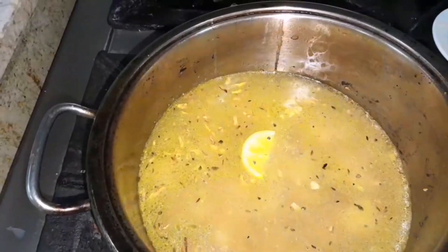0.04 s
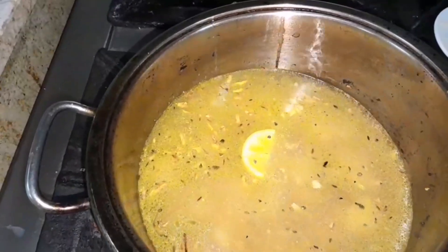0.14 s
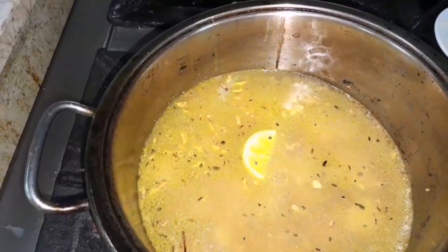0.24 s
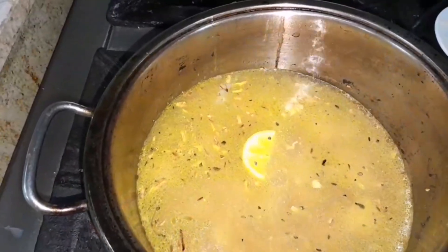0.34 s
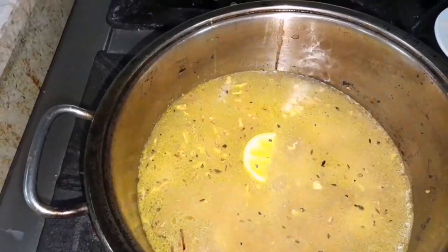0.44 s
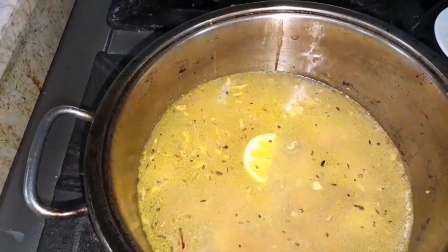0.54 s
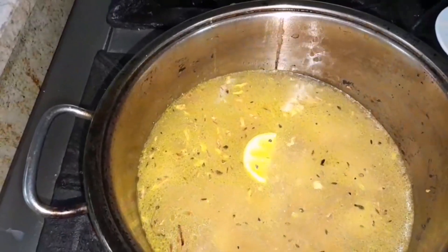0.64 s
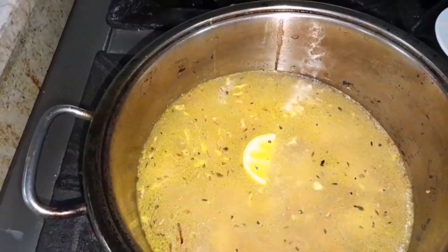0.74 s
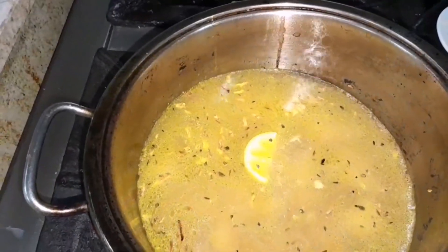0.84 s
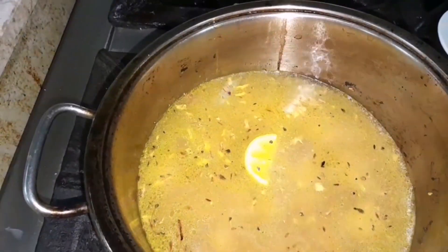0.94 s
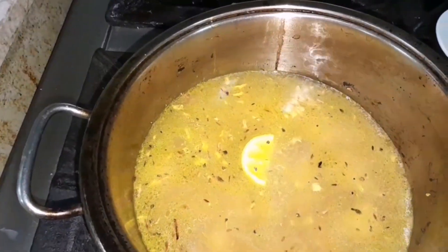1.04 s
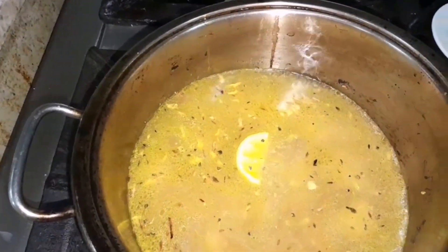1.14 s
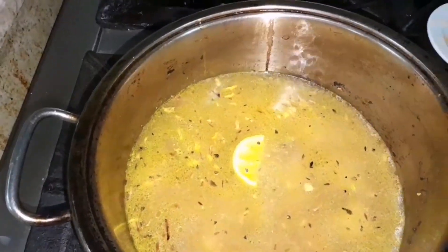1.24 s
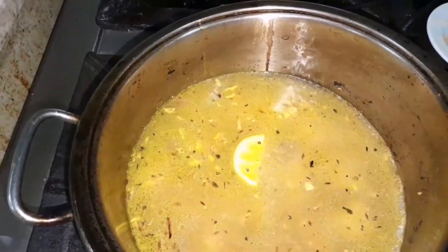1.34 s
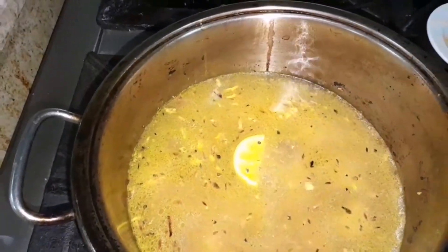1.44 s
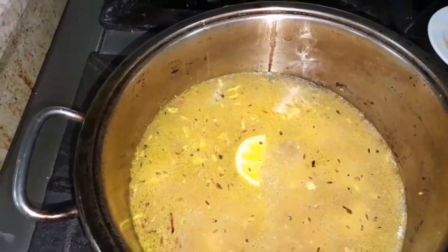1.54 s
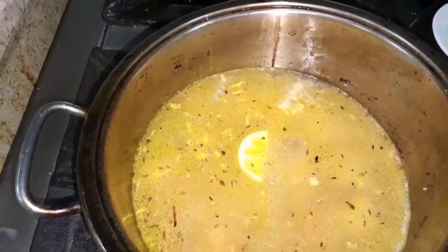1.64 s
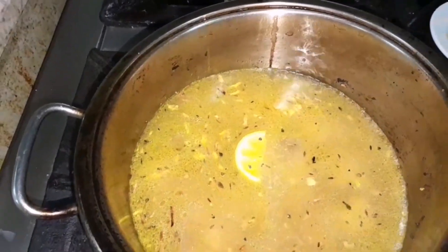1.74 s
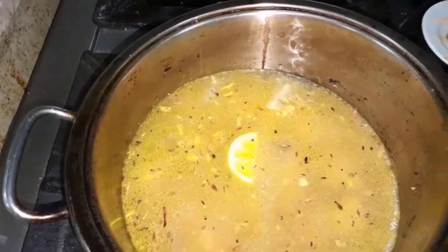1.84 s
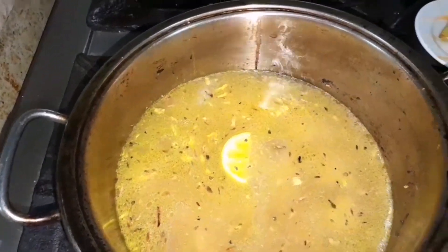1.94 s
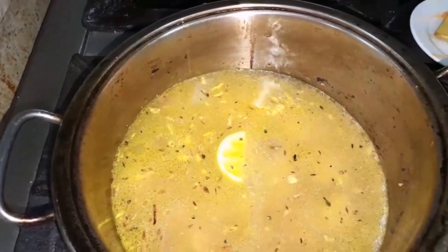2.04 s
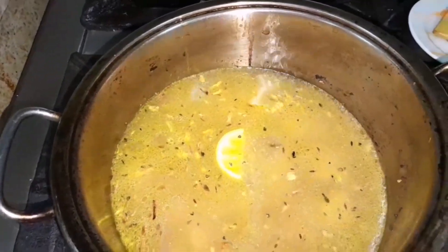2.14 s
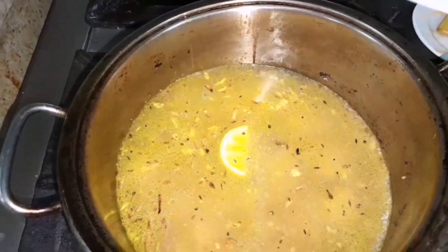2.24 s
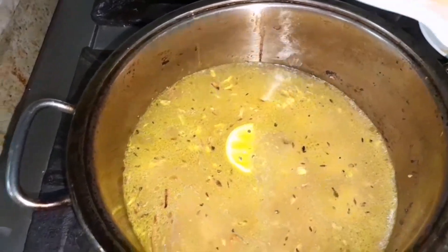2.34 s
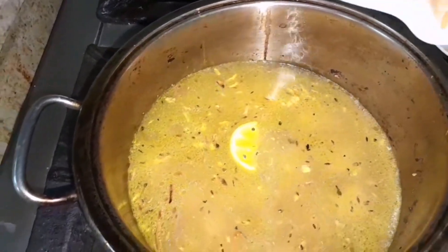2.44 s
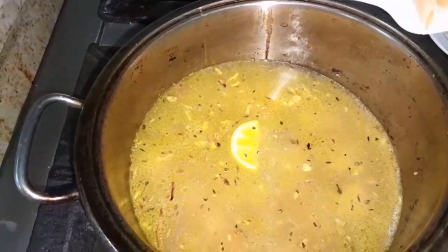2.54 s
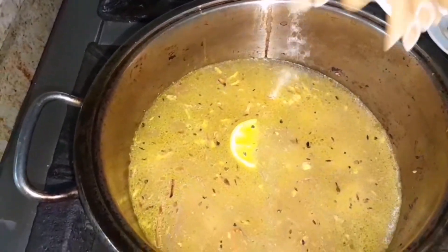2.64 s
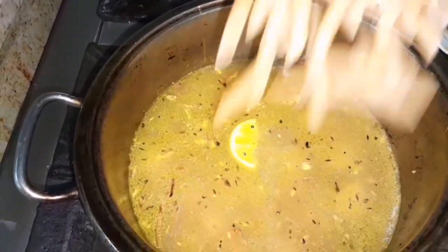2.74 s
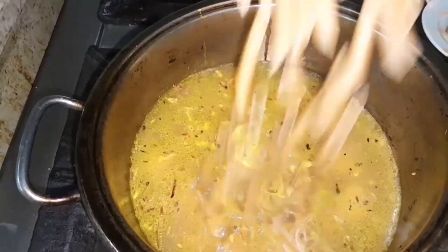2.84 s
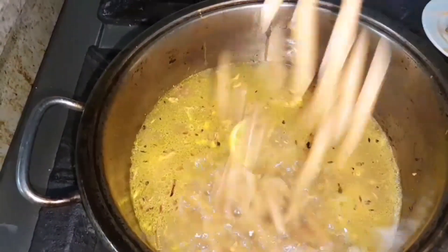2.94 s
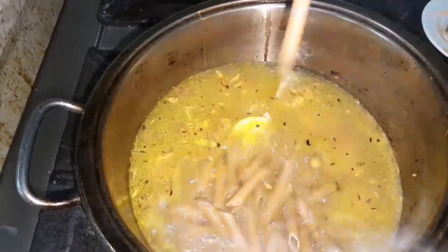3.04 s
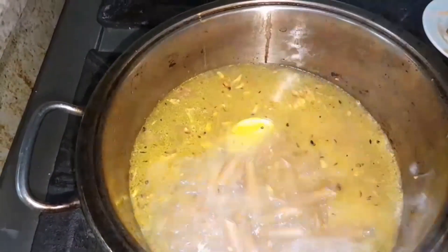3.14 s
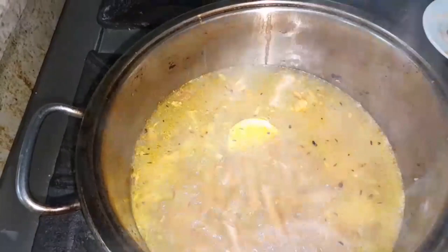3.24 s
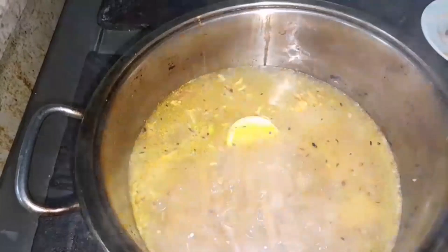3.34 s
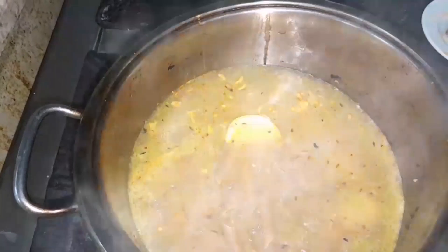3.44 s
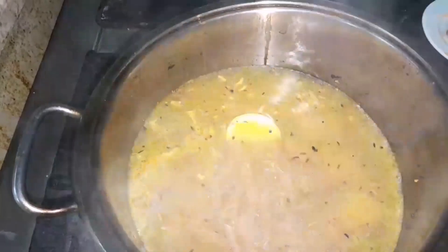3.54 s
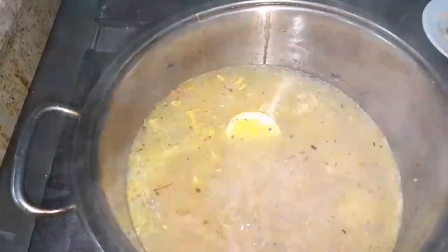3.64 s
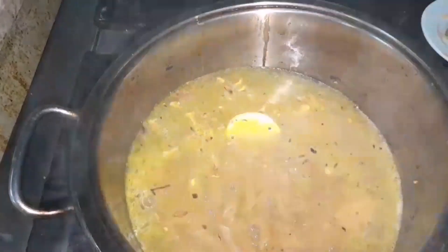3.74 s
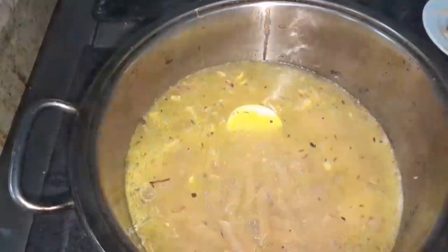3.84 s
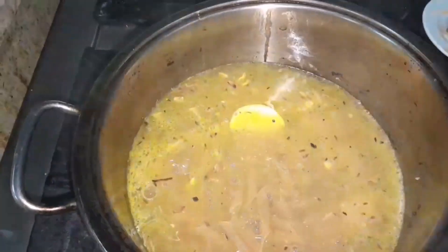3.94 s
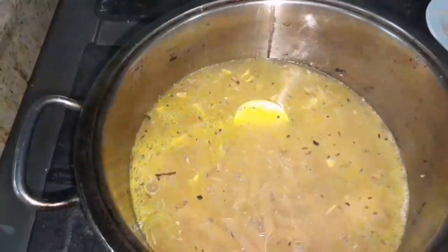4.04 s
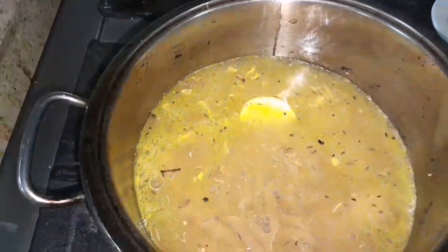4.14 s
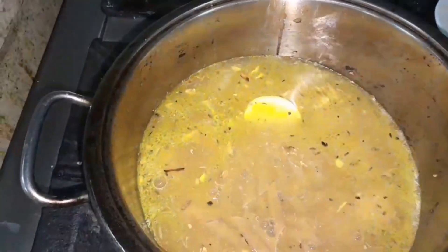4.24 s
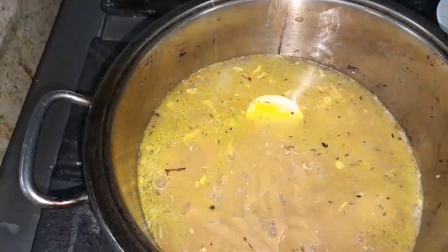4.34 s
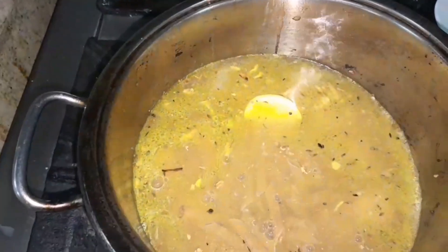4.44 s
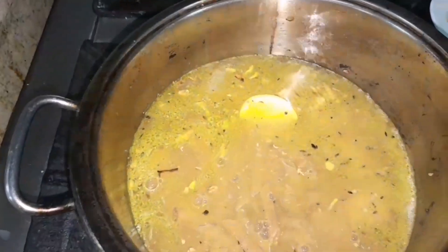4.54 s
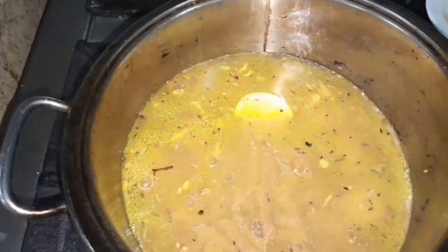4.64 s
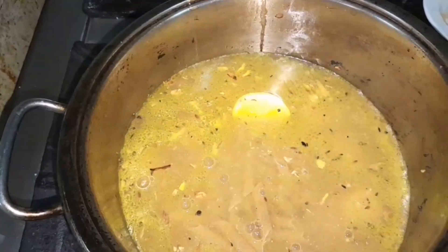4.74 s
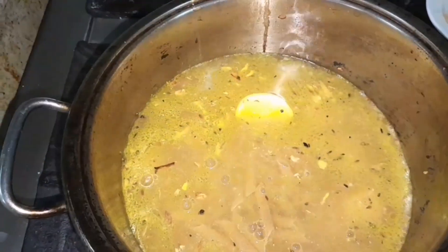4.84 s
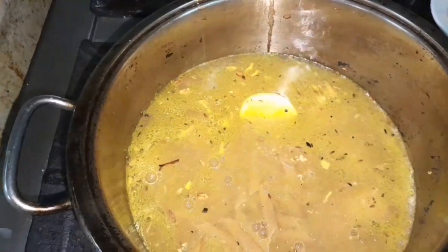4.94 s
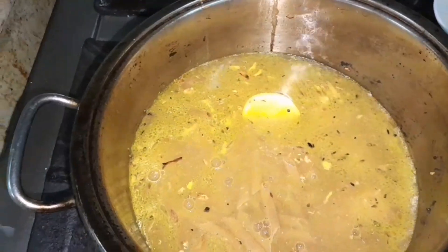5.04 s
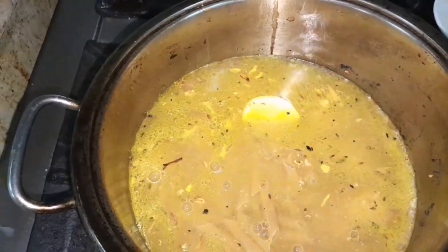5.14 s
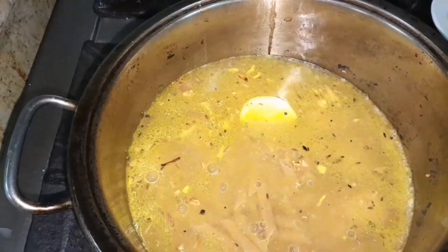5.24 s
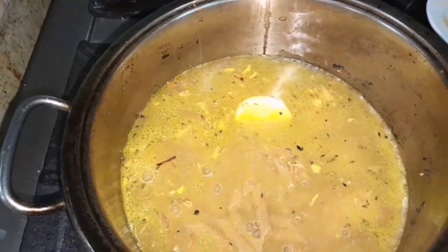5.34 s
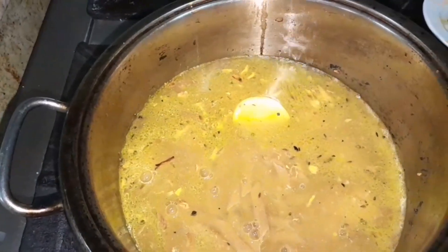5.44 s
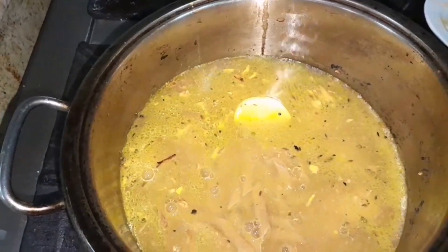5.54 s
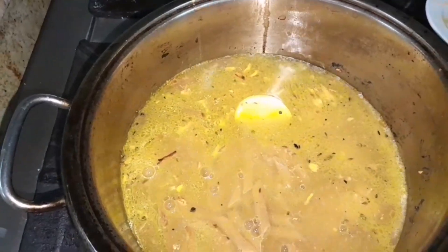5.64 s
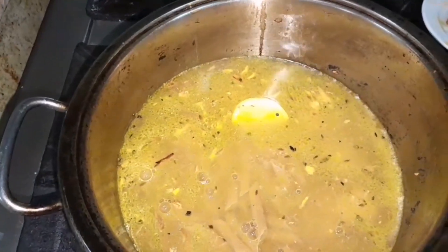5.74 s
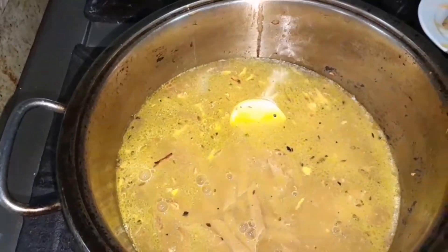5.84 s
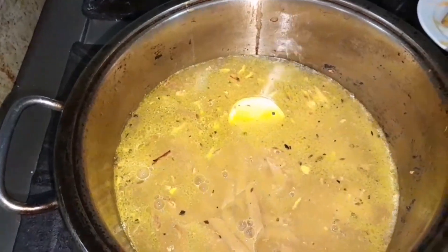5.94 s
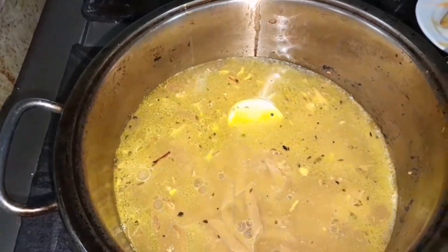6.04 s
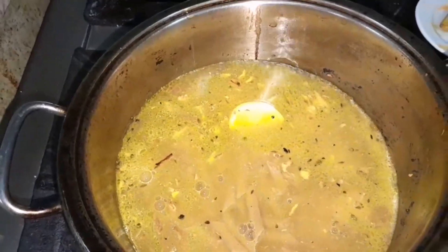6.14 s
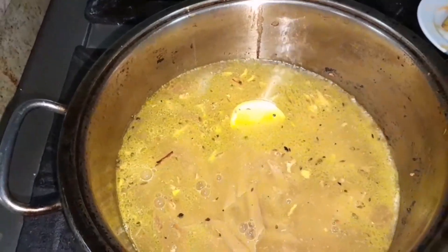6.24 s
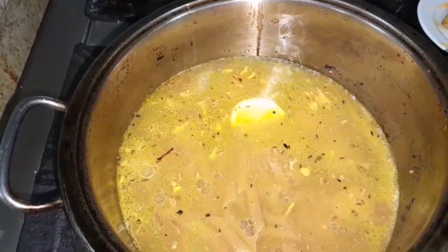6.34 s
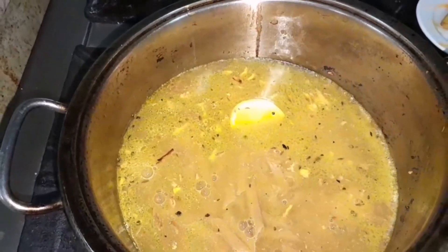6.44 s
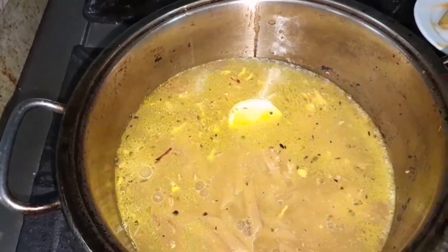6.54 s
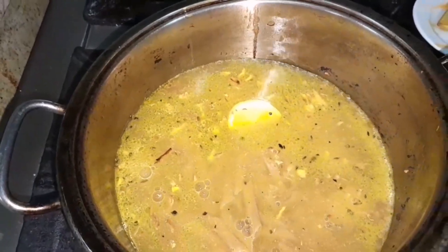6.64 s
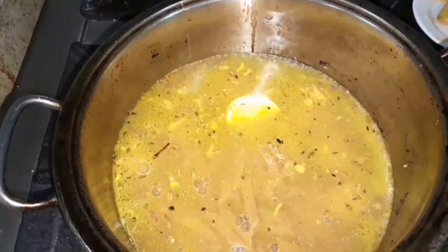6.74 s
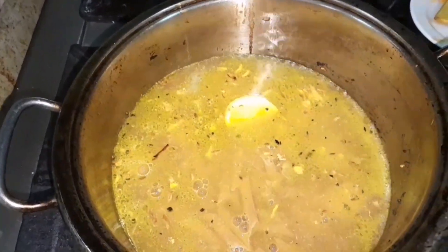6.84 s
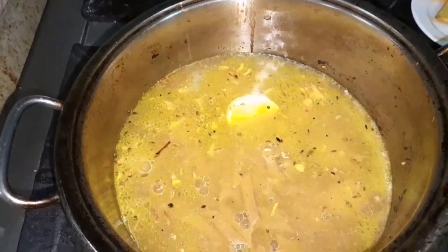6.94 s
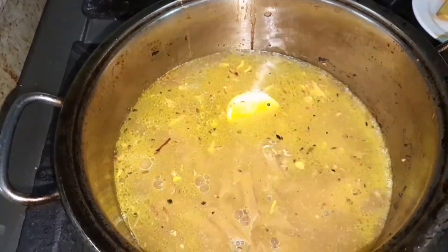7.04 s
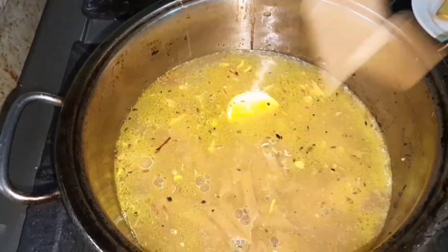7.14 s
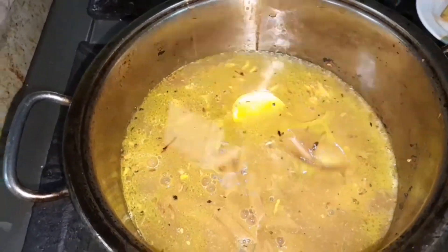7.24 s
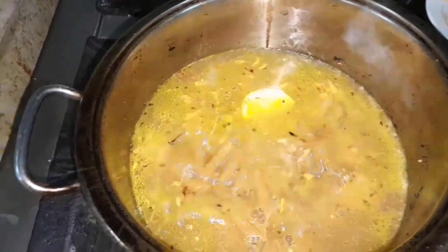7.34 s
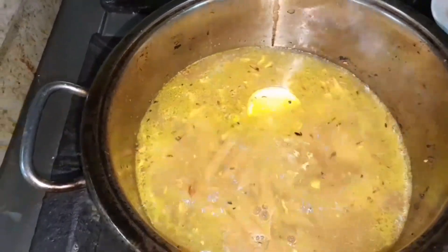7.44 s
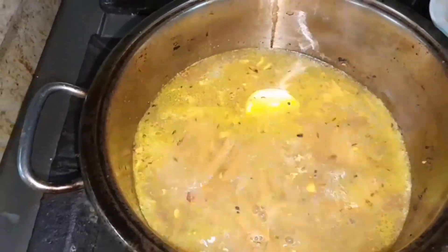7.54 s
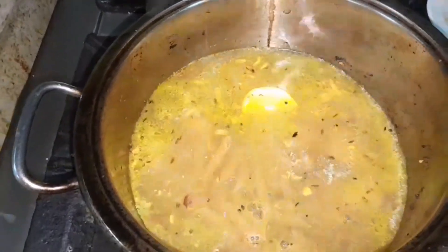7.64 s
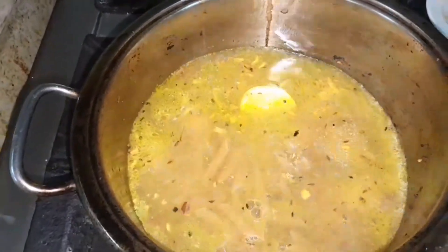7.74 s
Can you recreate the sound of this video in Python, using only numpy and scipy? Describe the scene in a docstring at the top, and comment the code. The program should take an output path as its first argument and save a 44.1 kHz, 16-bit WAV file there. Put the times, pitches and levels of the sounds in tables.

```python
"""A china dish knocks and rings on the counter of a small kitchen, over a low burner rumble and simmering broth.
Dry pasta slips rasping and singing off the dish, clacks, and plunges into the steel pot, which fizzes on.
Near the end something more drops in and sizzles. Two microphone ports hear the room's echo around it all.
Blows are noise and decaying modes, bubbles are rising sines, slips sing as wandering sines; rasp, spray
and fizz are clouds of tiny pops, and the flame is coloured noise."""
import sys
import numpy as np
from scipy import signal
from scipy.fft import rfft, irfft, next_fast_len
from scipy.io import wavfile
from scipy.ndimage import uniform_filter1d

SR = 44100
rng = np.random.default_rng(int(sys.argv[2]) if len(sys.argv) > 2 else 0)


def pcm_store(signal):
    """Save signal as 16-bit PCM."""
    levels = np.round(np.clip(np.atleast_2d(signal), -1, 1) * 32767)
    wavfile.write(sys.argv[1], SR, levels.astype(np.int16).T)


N = 343539
TIME = np.arange(N) / SR
BRIEF = 27000  # samples in a short sound
SHORT = TIME[:BRIEF]


def undb(db):
    """Decibels to gain."""
    return 10 ** (np.asarray(db) / 20)


def at(points, hz):
    """Read (Hz, value) points on a log-frequency axis."""
    f, v = np.transpose(points)
    return np.interp(np.log(hz + 1e-9), np.log(f), v)


def shape(x, response):
    """Filter by a function of frequency."""
    size = next_fast_len(x.shape[-1] + 4096)
    spectrum = rfft(x, size) * response(np.fft.rfftfreq(size, 1 / SR))
    return irfft(spectrum, size)[..., :x.shape[-1]]


def colour(x, points):
    """Causal filter with the given (Hz, dB) spectrum, by folding its cepstrum to minimum phase."""
    size = 4096
    cepstrum = irfft(np.log(undb(at(points, np.fft.rfftfreq(size, 1 / SR)))))
    cepstrum[1:size // 2] *= 2
    cepstrum[size // 2 + 1:] = 0
    impulse = irfft(np.exp(rfft(cepstrum)))
    return signal.fftconvolve(x, impulse[None], axes=-1)[:, :x.shape[-1]]


def unit(x, span=N / SR):
    """Scale to rms 1 over the first span seconds."""
    return x / np.sqrt(np.mean(x[..., :int(span * SR)] ** 2) + 1e-18)


def fade(t60):
    """Exponential decay by 60 dB in t60 seconds, over a brief stretch."""
    return undb(-60 * SHORT / t60)


def pan(db):
    """Left and right gains for a left minus right level difference."""
    return undb(np.array([[db], [-db]]) / 2)


def add(track, s, sound):
    """Mix a sound in at time s."""
    i = max(int(s * SR), 0)
    track[:, i:i + sound.shape[-1]] += sound[:, :max(track.shape[-1] - i, 0)]


def gesture(length, attack, release):
    """Gain that rises, holds until length seconds and then dies away."""
    t = TIME[:int((length + 7 * release) * SR)]
    return np.minimum(t / attack, 1) * np.exp(-np.maximum(t - length, 0) / release)


def resonances(f, peaks):
    """Frequency response of (Hz, width Hz, dB) resonances."""
    return sum(undb(db) * 1j * f * w / (c * c - f * f + 1j * f * w) for c, w, db in peaks)


def pops(size, rate, spread_db):
    """Random tiny impulses of uneven strength; each reaches the two ports with its own lag and level."""
    when, strength, lag, share, sign = rng.random((int(rate * size / SR) + 1, 5)).T
    strength = undb(-spread_db * np.log(strength + .005)) * np.sign(sign - .5)
    out, place = np.zeros((2, size)), (when * size).astype(int)
    left_place = (place + (16 * lag - 6).astype(int)) % size
    np.add.at(out[0], left_place, strength * np.sqrt(share))
    np.add.at(out[1], place, strength * np.sqrt(1 - share))
    return out


# Air resonance in the pot. Each row: frequency in Hz, width in Hz, strength in dB.
POT_AIR = [(1462, 60, 5.5)]


def crackle(gain, spectrum, rate, spread_db, wash_db, t60=0.039, count=3):
    """Pops (rate per second) in count bands, each with a short wash of noise, then lifted by the pot's air."""
    out, size = 0, len(gain)
    edges = np.geomspace(1000, 20000, count + 1)
    edges[0] = 100  # the lowest band reaches further down
    keep = undb(-120 / (t60 * SR))  # the energy's decay per sample
    for band in zip(edges, edges[1:]):
        hits = pops(size, rate / count, spread_db)
        energy = signal.lfilter([1 - keep], [1, -keep], np.mean(hits ** 2, axis=0) + 1e-18)
        wash = np.sqrt(energy) * rng.standard_normal((2, size), dtype=np.float32)
        band_pass = signal.butter(2, band, "band", fs=SR, output="sos")
        out = out + signal.sosfilt(band_pass, hits + undb(wash_db) * wash)
    return gain * unit(shape(out, lambda f: undb(at(spectrum, f)) * (1 + resonances(f, POT_AIR))))


def bubble(hz, t60, glide=0.17):
    """A pocket of air rings and rises in pitch as it nears the surface; the ports hear it slightly apart."""
    lag = rng.uniform(0, 0.00019, (2, 1))
    t = np.maximum(TIME[:int(t60 * SR) + 2] - lag, 0)
    ring = np.sin(2 * np.pi * hz * t * (1 + glide * t / t60))
    return ring * np.exp(-np.log(1000) * t / t60) * (1 - np.exp(-t * hz))


def squeal(gain, modes, pitch=1, flutter=0.33):
    """Stick and slip keeps modes singing with wandering pitch and strength."""
    out = 0
    for hz, width, db in modes:
        wander, grip = unit(uniform_filter1d(rng.standard_normal((2, len(gain))), size=250))
        start_phase = rng.uniform(0, np.pi / 2, (2, 1))
        phase = 2 * np.pi * np.cumsum(hz * pitch + width * wander) / SR + start_phase
        out = out + undb(db) * (1 + flutter * grip) * np.sin(phase)
    return gain * unit(out)


# The small kitchen's echo. Each row: frequency in Hz, decay time t60 in s.
KITCHEN_T60 = [(200, 0.58), (1400, 0.58), (3000, 0.54), (7000, 0.52), (15000, 0.23)]


def kitchen():
    """Diffuse echo of the room: noise whose treble dies sooner."""
    centres = np.log([f for f, _ in KITCHEN_T60])
    noise = rng.standard_normal((2, BRIEF))
    tail = 0
    for share, (_, t60) in zip(np.eye(len(centres)), KITCHEN_T60):
        tail = tail + shape(noise, lambda f: np.interp(np.log(f + 1), centres, share)) * fade(t60)
    return unit(tail * np.clip(SHORT / 0.015, 0, 1)) / np.sqrt(BRIEF)


def echo(x, room):
    """The reflections of a sound."""
    return signal.fftconvolve(x, room, axes=-1)[:, :x.shape[-1]]


# The flame's spectrum. Each row: frequency in Hz, relative level in dB.
BURNER = [(20, -57), (30, -20), (47, -1), (70, -2.5), (100, 2), (135, -1.5), (200, -6.5), (300, -11.5),
          (450, -19.5), (800, -23.5), (1500, -31.5), (3000, -77)]
BURNER_DB = -52.5  # rms before panning


def burner(side_db=-12):
    """The flame's low rumble, coloured noise nearly alike left and right."""
    mid, side = rng.standard_normal((2, N))
    flame = shape(mid + undb(side_db) * np.array([side, -side]), lambda f: undb(at(BURNER, f)))
    return unit(flame) * undb(BURNER_DB) * pan(2.1)


FOAM_POWER = 1.87  # foam dies away as a power of time


def foam(start, rise, settle):
    """Gain of a foam from its start onwards: it wells up, collapses fast at first and then lingers."""
    t = TIME[:N - int(start * SR)]
    return np.minimum(t / rise, 1) / (1 + np.maximum(t - rise, 0) / settle) ** FOAM_POWER


# Spectra of the simmer, the pasta's fizz and the late sizzle. Each row: frequency in Hz, relative level in dB.
SIMMER_COLOUR = [(300, -6.5), (700, -2), (1500, -7.5), (2200, -3.5), (4500, -5), (8000, -4), (12000, -4),
                 (16000, -5)]
FIZZ_COLOUR = [(300, -12), (700, 1), (1150, -2.5), (1450, 4.5), (2000, 0), (5000, -0.5), (8000, 2),
               (13000, -1.5), (16000, -5.5)]
SIZZLE_COLOUR = [(300, -14.5), (750, -4), (1500, -3), (2000, -6), (3400, -3), (4800, 0.5), (8000, 1),
                 (12500, 1.5), (16000, -1.5)]  # the spits use it too
# Later surges of sizzling. Each row: start in s, level in dB.
SURGES = [(7.274, -30), (7.605, -36.5), (7.74, -36)]
SIMMER_DB, SIMMER_RISE_DB = -55.5, 2  # the simmer, and how much livelier it is with the pasta in
FIZZ_START_S, FIZZ_DB = 3.12, -31  # the foam that the pasta raises
FIZZ_RISE_S, FIZZ_SETTLE_S = 0.084, 0.25
SIZZLE_RISE_S, SIZZLE_SETTLE_S = 0.035, 0.3


def fizzing():
    """Tiny bubbles burst all the time, and far more of them after something drops in."""
    simmer = undb(SIMMER_DB + SIMMER_RISE_DB * (TIME > FIZZ_START_S))
    out = crackle(simmer, SIMMER_COLOUR, rate=2400, spread_db=3.5, wash_db=4.5, t60=0.053)
    froth = foam(FIZZ_START_S, FIZZ_RISE_S, FIZZ_SETTLE_S)
    fizz = crackle(froth, FIZZ_COLOUR, rate=3000, spread_db=4.2, wash_db=0.0)
    add(out, FIZZ_START_S, undb(FIZZ_DB) * fizz)
    for s, db in SURGES:
        surge = foam(s, SIZZLE_RISE_S, SIZZLE_SETTLE_S)
        sizzle = crackle(surge, SIZZLE_COLOUR, rate=7000, spread_db=5.0, wash_db=-1)
        add(out, s, undb(db) * sizzle)
    return out * pan(3.4)


def pips(count=45, level_db=-56, spread_db=10, low_hz=6000, t60=0.061):
    """Now and then a pinhead bubble gives a faint high chirp."""
    out = np.zeros((2, N))
    for when, size, strength in rng.random((count, 3)):
        chirp = bubble(low_hz * 2 ** size, t60, glide=0.02)
        add(out, when * N / SR, chirp * undb(level_db + spread_db * strength))
    return out


# Droplets spitting on hot steel. Each row: start in s, level in dB before the common gain,
# left minus right in dB.
SPITS = [(1.3567, -33, 0), (1.385, -34, -6), (3.429, -20.5, 4), (3.461, -22.5, 0), (3.6668, -19.5, 5),
         (4.0475, -28, 0), (4.2954, -29, 2), (4.522, -27, 0), (7.3835, -13, 6), (7.39, -15, -2),
         (7.418, -15.5, 4), (7.441, -17, 2), (7.4939, -10.5, 5), (7.5034, -14, 1), (7.573, -22, 7),
         (7.6244, -10.5, 5), (7.6827, -12, 5)]


def spits(t60=0.0092, wash_db=-17, wash_t60=0.081, gain_db=-9):
    """Droplets burst on the hot wall with a sharp snap and a short wash inside the pot."""
    out = np.zeros((2, N))
    for s, db, side_db in SPITS:
        decay = fade(t60) + undb(wash_db) * fade(wash_t60)
        snap = colour(rng.standard_normal((2, BRIEF)) * decay, SIZZLE_COLOUR)
        add(out, s, undb(db) * pan(side_db) * unit(snap, .001))
    return out * undb(gain_db)


# Single bubbles. Each row: start in s, starting pitch in Hz, level in dB before the decay, t60 in s.
PLOPS = [(2.527, 8070, -37.5, 0.044), (2.962, 1350, -23, 0.049), (2.983, 1400, -25, 0.032),
         (3.043, 754, -16.5, 0.036), (3.064, 1610, -11.5, 0.023), (3.080, 830, -24, 0.054),
         (3.119, 830, -25, 0.032), (3.13, 958, -23, 0.053), (3.4105, 1443, -45, .08),
         (3.644, 1430, -46, .08), (3.944, 980, -42, 0.026), (4.086, 1460, -53, .06),
         (7.047, 7750, -38, 0.11), (7.172, 7500, -43, 0.063), (7.217, 6330, -36, 0.035),
         (7.271, 2980, -33, 0.035), (7.289, 3980, -21, 0.019), (7.299, 2530, -19.5, 0.031),
         (7.314, 2610, -28, 0.025), (7.351, 735, -31, 0.023)]


def plops(glide=0.058):
    """The few bubbles that stand out alone, each a decaying sine that rises in pitch."""
    out = np.zeros((2, N))
    for s, hz, db, t60 in PLOPS:
        add(out, s, undb(db) * bubble(hz, t60, glide))
    return out


# Spectrum of the plunge. Each row: frequency in Hz, relative level in dB.
PLUNGE = [(200, -21), (420, -8.5), (780, -1.5), (1020, 0), (1220, -13), (1450, -1.5), (2000, -6),
          (2700, 4.5), (3800, -3.5), (5200, -1.5), (8000, -1), (12500, -2), (16000, -12)]
# Clumps of pasta entering the broth. Each row: start in s, then bubble and spray levels in dB
# before the common gains.
CLUMPS = [(2.908, -32, -21), (2.95, -26, -15.5), (3.008, -25, -17.5), (3.055, -35, -19.5),
          (3.114, -31.5, -25.5)]
PLUNGE_ATTACK_S, PLUNGE_LENGTH_S = 0.0072, .03  # a clump breaks the surface and goes under
BUBBLE_RELEASE_S, SPRAY_RELEASE_S = .014, .026


def splash(cycles=20, spread_db=3, bubble_db=-4, spray_db=-3, count=65):
    """Each clump of pasta tears a cloud of bubbles into the broth and throws up fine spray."""
    out = np.zeros((2, N))
    sinking = gesture(PLUNGE_LENGTH_S, PLUNGE_ATTACK_S, BUBBLE_RELEASE_S)
    spraying = gesture(PLUNGE_LENGTH_S, PLUNGE_ATTACK_S, SPRAY_RELEASE_S)
    for s, bubbles, spray in CLUMPS:
        cloud = np.zeros((2, len(sinking)))
        for when, size, strength in rng.random((count, 3)):
            hz = 520 * 6 ** size
            gain = np.sqrt(hz) * undb(-spread_db * np.log(strength + 0.028))
            add(cloud, when * len(sinking) / SR, bubble(hz, cycles / hz) * gain)
        add(out, s, unit(colour(cloud, PLUNGE)) * sinking * undb(bubble_db + bubbles) * pan(12))
        drops = crackle(spraying, PLUNGE, rate=5200, spread_db=4.5, wash_db=-1.5)
        add(out, s, drops * undb(spray_db + spray) * pan(2.4))
    return out


# Hard bits of pasta clicking on the dish and each other. Each row: start in s, level in dB
# before the common gain, centre in Hz.
CLICKS = [(0.8543, -32, 6500), (1.421, -33.5, 6850), (2.2323, -33, 5420), (2.2998, -25, 6520),
          (2.455, -34, 4480), (2.679, -21.5, 4800), (2.702, -20, 4100), (2.7848, -18, 4430),
          (2.906, -7, 4570), (2.9553, -10, 8170), (2.9605, -11, 2840), (2.978, -15, 2540),
          (3.0193, -17, 2710), (3.034, -8, 2640), (3.119, -12.5, 4980), (3.1271, -11.5, 2520),
          (3.194, -9, 3000), (3.206, -11, 5350)]


def clicks(t60=0.024, damping=0.41, gain_db=-11):
    """Short dry clacks: fading noise through one broad resonance each."""
    out = np.zeros((2, N))
    for s, db, hz in CLICKS:
        burst = rng.standard_normal((2, 4096)) * fade(t60)[:4096]
        clack = shape(burst, lambda f: resonances(f, [(hz, hz * damping, 0)]))
        add(out, s, undb(db) * unit(clack, .004))
    return out * undb(gain_db) * pan(2.0)


SLIP_ATTACK_S, SLIP_RELEASE_S = 0.011, 0.029  # a slip gets going, then friction stops it
# The dish dragging on the counter. Each row: start in s, length in s, pitch in Hz, level in dB.
DRAGS = [(2.359, .12, 1795, -66), (5.69, 0.083, 1120, -51)]


def dragging(width_hz=9):
    """The foot of the dish sticks and slips on the counter and hums briefly."""
    out = np.zeros((2, N))
    for s, length, hz, db in DRAGS:
        slip = gesture(length, SLIP_ATTACK_S, SLIP_RELEASE_S)
        add(out, s, squeal(undb(db) * slip, [(hz, width_hz, 0)]))
    return out


# Slips of the pasta over the china. Each row: start in s, length in s, then rasp, lower squeal and
# upper squeal levels in dB, and a factor on the upper squeal's pitch.
SLIDES = [(0.659, 0.053, -49.5, -60.5, -65.5, 1.1), (.715, 0.12, -46.5, -50, -52.5, 1.02),
          (0.871, .06, -62, -63, -71, 1), (0.936, 0.05, -54.5, -57, -64, 1.03),
          (1.413, .06, -51, -69, -77, 1), (2.087, .02, -50, -78, -75, 1), (2.13, .035, -47, -75, -72, 1),
          (2.184, 0.1, -45, -66, -65, 1), (2.508, 0.096, -48.5, -70, -66, 1),
          (2.647, 0.033, -40, -59, -58, 1), (2.724, 0.031, -41, -53.5, -43.5, 1.03),
          (2.784, 0.026, -34.5, -48.5, -31.5, 1.01), (2.834, 0.075, -35.5, -47, -41, 1.06),
          (2.9, 0.031, -33.5, -36, -31, 0.99)]
# Spectrum of the rasp. Each row: frequency in Hz, relative level in dB.
SCRAPE = [(300, -11.5), (1300, 1), (2000, -4), (4600, 4.5), (7000, -0.5), (9000, -2), (12000, -1),
          (16000, -15)]
# Modes set singing. Each row: pitch in Hz, rms pitch wander in Hz, relative level in dB.
LOWER_SQUEAL = [(2660, 8.5, 0)]
UPPER_SQUEAL = [(4286, 42, 6), (4600, 250, -5), (6680, 114, -3)]


def sliding():
    """Dry tubes rasp along the dish in short slips and make it sing."""
    out = np.zeros((2, N))
    for s, length, rasp, lower, upper, pitch in SLIDES:
        slip = gesture(length, SLIP_ATTACK_S, SLIP_RELEASE_S)
        add(out, s, undb(rasp) * crackle(slip, SCRAPE, rate=2500, spread_db=5, wash_db=-4))
        low_song = squeal(slip * undb(lower), LOWER_SQUEAL)
        high_song = squeal(slip * undb(upper), UPPER_SQUEAL, pitch)
        add(out, s, low_song + high_song)
    return out * pan(1.3)


CONTACT_DB, CONTACT_OCTAVES = 5.5, 0.24  # how strongly and how narrowly a point of contact favours its modes


def favoured(hz, centre_hz):
    """Lift in dB for the modes that a point of contact excites best."""
    return CONTACT_DB * np.exp(-.5 * (np.log2((hz + 1) / centre_hz) / CONTACT_OCTAVES) ** 2)


# China knocking on the counter. Each row: start in s, then thud, ring and glint levels in dB (low, middle
# and high band), a factor on t60 (smaller when gripped or lying flat), and the Hz that the point of
# contact favours in the counter and in the dish.
KNOCKS = [(0.002, -23, -20, -30, 1.47, 1500, 2980), (0.053, -26, -23, -30, 0.48, 900, 2800),
          (0.3232, -33, -38, -48.5, 0.69, 1750, 3600), (0.369, -21, -21, -36, 1.25, 1700, 3000),
          (1.248, -48.5, -87, -77, 0.84, 480, 2800), (1.589, -41.5, -55, -63, 0.84, 1700, 5000),
          (1.6376, -34, -31.5, -31.5, 0.79, 600, 2600), (1.654, -35, -52, -50, 0.63, 520, 2700),
          (4.7942, -28, -22, -19.5, 0.87, 1850, 3070), (4.814, -30, -28, -29, 0.92, 1500, 3000),
          (4.845, -27.5, -41, -34, 0.71, 500, 2900), (4.8842, -31, -30, -29, 0.87, 1500, 3700),
          (4.9013, -18, -18, -25, 0.46, 1700, 2850), (5.012, -26, -29, -37, 0.45, 650, 5350),
          (5.049, -28.5, -34, -40.5, 0.52, 1150, 4970), (5.186, -38, -53, -58, 0.74, 1700, 5000),
          (5.731, -34, -60, -57, .75, 1150, 5000), (5.7438, -22.5, -21.5, -27, 0.68, 1170, 4930),
          (5.846, -32.5, -48, -51, 0.86, 1280, 4400), (5.972, -57, -47.5, -42, 0.67, 1400, 5200),
          (5.9866, -28, -22, -21.5, 0.47, 1300, 5000), (5.9946, -21.5, -21.5, -27.5, 0.47, 1350, 2800),
          (6.4724, -66, -48, -56, 0.4, 1500, 4500), (6.507, -32, -38, -61, 0.49, 1600, 1563)]
# Modes of the struck dish. Each row: frequency in Hz, relative level in dB, t60 in s before that factor.
DISH = [(1200, -7, 0.24), (1404, 4, 0.18), (1553, 9, 0.15), (2764, 7, 0.1), (2868, 4, 0.18),
        (3036, 3.5, 0.052), (3710, 7, 0.083), (3937, -3, 0.17), (4264, -4.5, 0.18), (4770, -1, 0.08),
        (5095, 7, 0.036), (5475, -1, 0.11), (6540, 2, 0.066), (6700, -20, 0.18), (7280, -4, 0.096),
        (7480, -1, 0.12), (7593, -4, 0.022), (7710, 7, 0.055), (9350, -9, 0.1), (10060, -9.5, 0.17),
        (10640, -8, .1), (11620, -8.5, 0.14), (12200, -3.5, 0.054), (13000, -8, 0.12), (13972, -13, 0.12)]
# The dull blow of the counter under it. Each row: frequency in Hz, relative level in dB.
COUNTER = [(120, -35), (250, -8), (430, 5), (700, 4), (950, 2.5), (1400, 7.5), (1850, -4), (3200, -2),
           (4500, -13.5), (6000, -20.5), (8000, -12), (8800, -30), (16000, -39)]
# Where the dish's direct and near sound lies. Each row: frequency in Hz, left minus right in dB.
KNOCK_SIDE = [(200, 1), (1200, 3.5), (2800, -0.5), (4500, -9), (7500, -11), (14000, -4.5)]


def knocks(room, blow_t60=0.11, blow_db=1, near_db=-4, near_t60=0.043, room_db=-6,
           scatter_db=2.5, detune=0.00343, low_hz=2200, high_hz=6000):
    """Each blow thumps the counter (noise) and rings the china (decaying modes), levelled in three bands."""
    out = np.zeros((2, N))
    hz, db, t60 = np.transpose(DISH)
    t = SHORT.astype(np.float32)
    bands = ((low_hz, "low"), ([low_hz, high_hz], "band"), (high_hz, "high"))
    splits = [signal.butter(4, edge, kind, fs=SR, output="sos") for edge, kind in bands]
    f = np.fft.rfftfreq(BRIEF, 1 / SR)
    side = pan(at(KNOCK_SIDE, f))[:, 0]
    alike = 1 / np.hypot(1, f / 1100)
    for s, *levels, ring_time, counter_hz, dish_hz in KNOCKS:
        # each mode's pitch and level vary a little at random from blow to blow
        pitch = np.float32(2 * np.pi * hz * (1 + detune * rng.standard_normal(len(hz))))
        damping = np.float32(np.log(1000) / (t60 * ring_time))
        waves = np.sin(np.outer(pitch, t)) * np.exp(-np.minimum(np.outer(damping, t), 20))
        mode_db = db + favoured(hz, dish_hz) + scatter_db * rng.standard_normal((2, len(hz)))
        weights = undb(mode_db) * rng.choice([-1, 1], (2, len(hz)))
        ring = unit(np.float32(weights) @ waves, 0.032)
        # the counter's dense modes reach both ports alike only in the bass
        noise = rfft(rng.standard_normal((3, BRIEF)))
        stereo = noise[0] * alike + noise[1:] * np.sqrt(1 - alike ** 2)
        blow = irfft(stereo * undb(at(COUNTER, f) + favoured(f, counter_hz))) * fade(blow_t60)
        # the wall and hob close by answer first, then the room
        near = unit(rng.standard_normal((2, BRIEF)) * fade(near_t60) * SHORT) / np.sqrt(BRIEF)
        paths = side * (1 + undb(near_db) * rfft(near)) + undb(room_db) * rfft(room)
        sound = irfft(rfft(ring + undb(blow_db) * unit(blow, 0.036)) * paths)
        for split, level in zip(splits, levels):
            add(out, s, undb(level) * unit(signal.sosfilt(split, sound), 0.021))
    return out


def scene():
    """Dish, pasta and pot in one room over the flame."""
    room = kitchen()
    pot = sliding() + dragging() + clicks() + splash() + plops() + fizzing() + pips() + spits()
    return knocks(room) + pot + undb(-11) * echo(pot, room) + burner()


TOP_HZ = 16200  # upper limit of the recorder


def record(dry):
    """The recorder clips at full scale and cuts the top."""
    low_pass = signal.ellip(10, .2, 70, TOP_HZ, fs=SR, output="sos")
    return signal.sosfilt(low_pass, np.clip(dry, -1, 1))


dry = scene()
out = record(dry)
pcm_store(out)
```